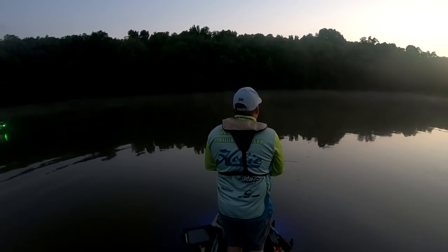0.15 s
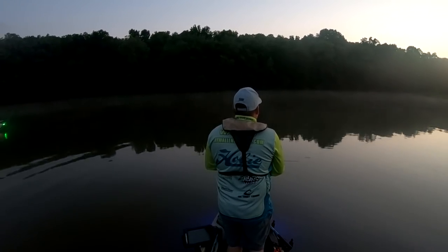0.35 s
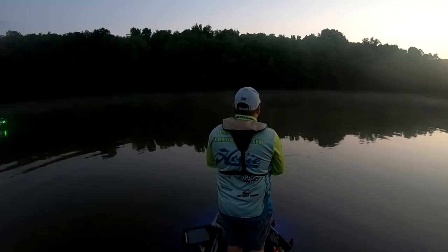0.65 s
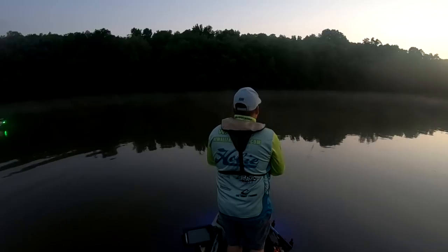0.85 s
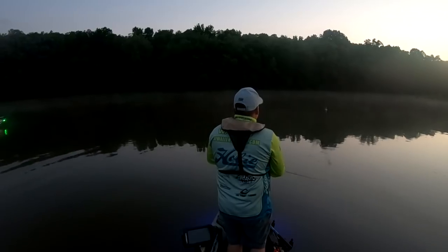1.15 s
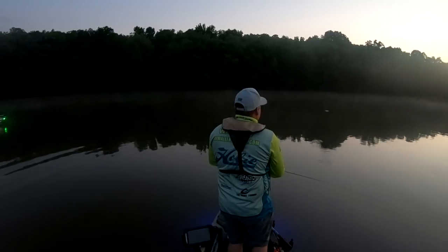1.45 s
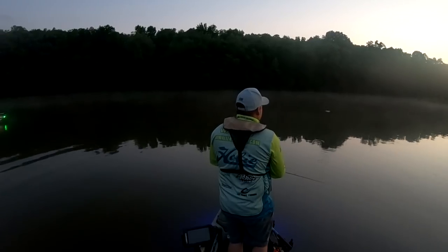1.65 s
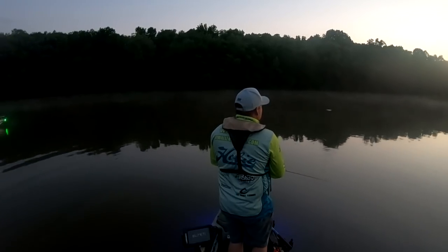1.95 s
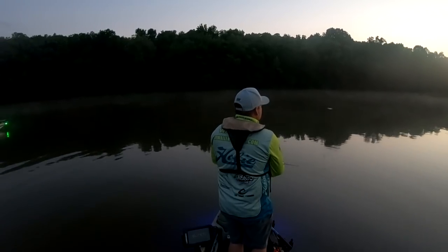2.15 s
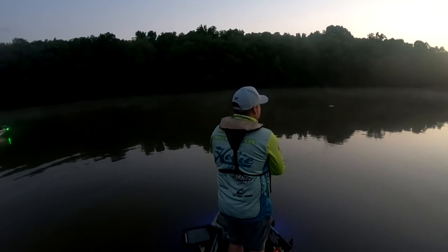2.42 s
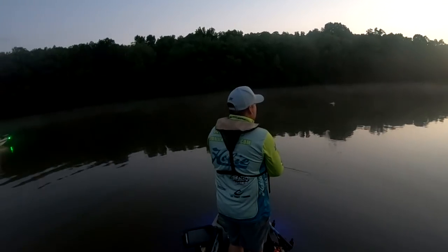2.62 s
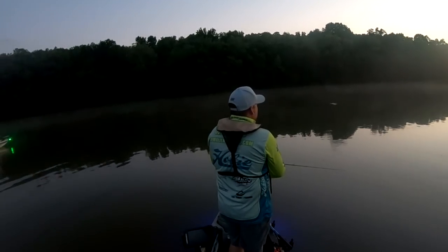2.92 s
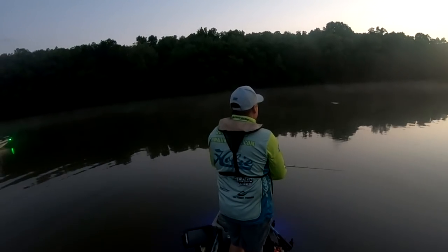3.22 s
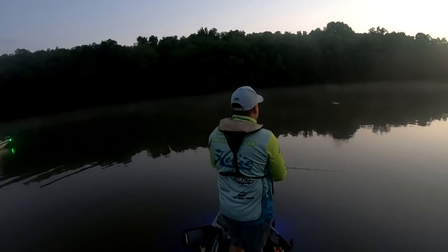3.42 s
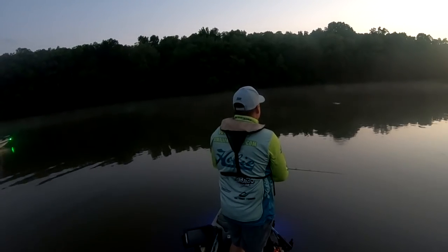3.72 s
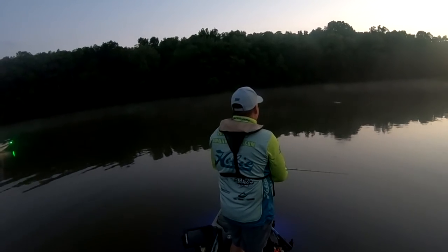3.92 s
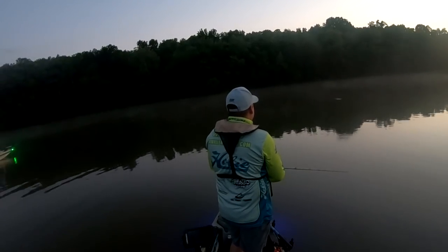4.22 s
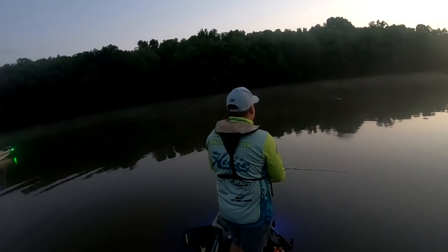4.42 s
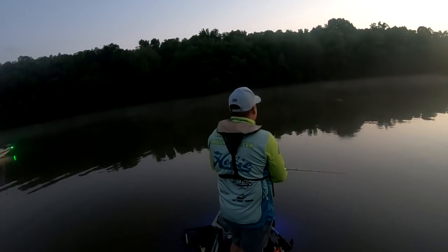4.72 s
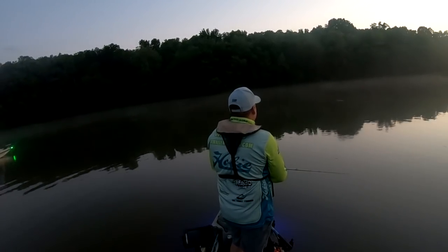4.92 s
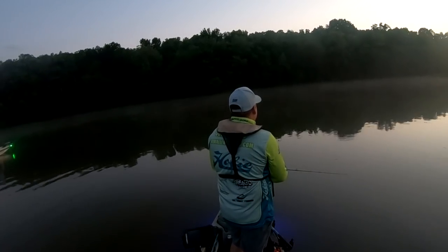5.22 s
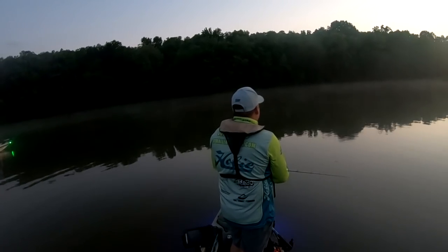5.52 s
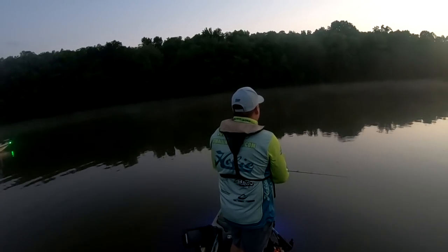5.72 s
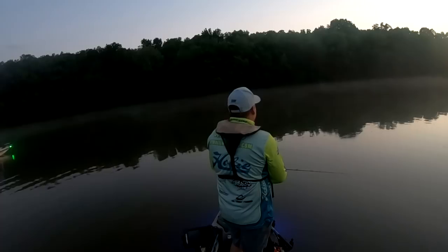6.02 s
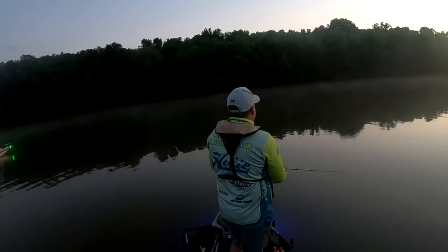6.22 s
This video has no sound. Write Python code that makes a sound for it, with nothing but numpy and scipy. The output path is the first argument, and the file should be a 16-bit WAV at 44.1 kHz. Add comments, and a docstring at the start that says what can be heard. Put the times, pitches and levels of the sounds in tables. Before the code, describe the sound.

A microphone on a small boat picks up irregular, deep wind buffeting beneath a busy, delicate bird chorus with soft woodland echo. Near birds whistle, slur and chirp constantly, with distant voices blending behind them. A few small clicks and muffled hull knocks interrupt early on. Later, high paired notes climb in volume, and two quick descending stutters close the scene over faint wash and hiss.

```python
"""Dawn on a still lake, heard from a small boat. Throughout: wooded-shore chorus, hull wash, murmur and hiss,
while air rumbles unevenly on the microphone ports. Near birds whistle, slide, tsip, buzz and arch from the start;
boat ticks and bumps join after 1 s, rising see-see pairs near 4 s, a stuttering call just after 6 s.
Birds are swept sines with trembling pitch and level, plus shore echoes and a diffuse wood tail;
air and far blur are shaped noise; boat contacts are noise bursts in damped resonances."""
import sys
import numpy as np
from scipy import signal
from scipy.fft import rfft, irfft
from scipy.io import wavfile
from scipy.ndimage import uniform_filter1d

SR = 44100
rng = np.random.default_rng(int(sys.argv[2]) if len(sys.argv) > 2 else 0)


def wav_out(sig):
    """Save sig, one row per channel (or a flat mono array), as 16-bit PCM at SR to the path in sys.argv[1]."""
    wavfile.write(sys.argv[1], SR, np.round(np.clip(np.atleast_2d(sig).T, -1, 1) * 32767).astype(np.int16))


N = 280476
TIME_S = np.arange(N) / SR
BINS_HZ = np.arange(N // 2 + 1) * SR / N

# Landscape murmur spectrum: (frequency [Hz], relative density [dB/Hz])
MURMUR_SPECTRUM = [(200, 0), (310, 0), (385, -5), (470, -3), (570, -6), (730, 0), (860, -.5), (1020, -12),
                   (1400, -11), (1750, -13), (2600, -20)]
# Hiss spectrum: (frequency [Hz], relative density [dB/Hz])
HISS_SPECTRUM = [(300, 3.5), (1500, -0.5), (5000, -7), (8000, -9), (12500, -11.5)]
# Air on the ports, before layer gains: (time [s], deep rumble [dB], upper flutter [dB])
WIND_DB = [(0.0, -43.5, -51.5), (0.44, -32, -37.5), (1.04, -43.5, -50.5), (1.29, -36.5, -40),
           (1.66, -35.5, -40), (1.75, -50, -54), (1.99, -27.5, -35.5), (2.01, -30.5, -43), (2.3, -39, -33),
           (2.35, -24.5, -32), (2.67, -31.5, -35), (2.83, -37.5, -45), (3.65, -32.5, -47),
           (3.89, -39.5, -45.5), (3.94, -26, -47), (3.99, -27.5, -35), (4.04, -34.5, -40.5),
           (4.15, -25.5, -43.5), (4.24, -26, -35), (4.31, -41.5, -49.5), (4.59, -45.5, -58),
           (4.96, -39.5, -47), (5.35, -45, -53.5), (5.65, -22, -36.5), (5.93, -32.5, -42.5),
           (6.34, -29, -43.5)]
# Single puffs on the ports: (time [s], rise above the surrounding wind [dB])
PUFFS = [(.71, 10), (1.451, 7), (3.41, 4.5)]
# Deep buffeting spectrum: (frequency [Hz], relative density [dB/Hz])
RUMBLE_SPECTRUM = [(12, -30), (25, 2.5), (40, -4), (62, -2), (80, -13.5), (120, -21)]
# Upper buffeting spectrum: (frequency [Hz], relative density [dB/Hz])
FLUTTER_SPECTRUM = [(45, -15.5), (72, 2), (100, -4), (130, -8), (170, -16.5), (220, -26.5), (300, -47.5),
                    (500, -56)]
# Wash around the hull: (frequency [Hz], relative density [dB/Hz])
WASH_SPECTRUM = [(80, -30), (130, -3), (180, 7.5), (225, -6.5), (280, -19), (400, -27)]
RUMBLE_GAIN_DB, FLUTTER_GAIN_DB = 0.69, 2.5
PUFF_HALF_S, GUST_SCALE_DB = 0.015, 0.89  # 1/e half-length; multiplies walk()

# Far singers, before layer gains: (time [s], low voices [dB], high voices [dB])
CHORUS_DB = [(0.0, -68, -80.5), (0.69, -69, -80.5), (2.57, -69, -78), (2.73, -68.5, -71),
             (4.52, -69.5, -73), (5.17, -65.5, -81.5), (6.0, -68, -77), (6.36, -68.5, -80)]
# Low far voices: (frequency [Hz], relative density [dB/Hz])
LOW_VOICE_SPECTRUM = [(1600, -26), (2000, -10), (2400, -4.5), (3000, -2), (3600, -9), (4200, -13.5),
                      (5000, -18)]
# High far voices: (frequency [Hz], relative density [dB/Hz])
HIGH_VOICE_SPECTRUM = [(4000, -12.5), (4900, -4.5), (5250, 0), (5700, -6), (6300, -6.5), (7000, -11.5),
                       (7600, -12.5), (8100, -34)]

# Level whistles: (start [s], length [s], mid-note pitch [Hz], level [dB])
WHISTLES = [(0.554, 0.17, 2790, -65), (0.767, 0.044, 2353, -64), (0.947, 0.18, 2984, -67.5),
            (1.104, 0.049, 2340, -64.5), (1.273, 0.2, 3030, -64), (1.708, 0.091, 3000, -64),
            (2.212, 0.033, 5300, -64.5), (2.232, 0.086, 2630, -65), (2.506, .09, 2616, -62.5),
            (2.603, 0.14, 2714, -70), (2.805, 0.061, 2078, -65.5), (2.892, 0.13, 2674, -67.5),
            (3.712, .17, 3990, -65), (4.208, 0.18, 2814, -66.5), (4.554, 0.16, 2934, -64.5),
            (4.752, 0.044, 2400, -65), (4.917, 0.029, 2940, -62), (5.104, 0.07, 3450, -66.5)]
WHISTLE_DROOP, WHISTLE_LEFT_DB = 0.012, 3.5  # share by which both ends lie flat; left minus right
# Slurs that settle on a pitch: (start [s], length [s], first [Hz], final [Hz], level [dB])
SLIDES = [(.005, 0.076, 3600, 3170, -66.5), (0.646, 0.064, 2310, 2817, -67), (1.566, 0.13, 3560, 2833, -66),
          (1.615, .05, 2547, 2944, -58.5), (2.106, 0.059, 2890, 2634, -61), (2.293, .12, 3036, 3250, -58),
          (2.338, .085, 3540, 4220, -71), (2.53, .06, 4040, 3155, -58), (2.565, .1, 6010, 4930, -65),
          (2.591, 0.036, 3150, 3440, -57.5), (2.951, .07, 5960, 4700, -63), (2.608, .09, 3760, 4190, -69.5),
          (3.2, .085, 6510, 5370, -58.5), (3.358, 0.045, 4340, 4590, -63),
          (3.587, 0.062, 6340, 4270, -64.5), (3.641, 0.082, 3950, 3326, -64), (5.003, .08, 3150, 2964, -66),
          (5.06, .09, 2590, 2430, -65.5), (5.226, 0.056, 2900, 3240, -57), (6.323, 0.038, 2265, 2370, -64)]
SLIDE_EASE, SLIDE_LEFT_DB = 2.4, -1  # higher ease settles earlier
# Exponential sweeps: (start [s], length [s], first [Hz], last [Hz], level [dB])
SWEEPS = [(0.617, .025, 3180, 3620, -67), (.93, 0.024, 4760, 4250, -66), (1.012, 0.095, 3790, 2190, -65.5),
          (1.286, 0.041, 2700, 4660, -63.5), (1.36, .012, 4570, 3380, -61.5),
          (1.815, .055, 4643, 5380, -71.5), (2.489, 0.061, 5440, 3950, -70),
          (2.753, 0.046, 3480, 2110, -63), (2.932, .042, 3690, 1956, -65), (3.042, 0.097, 4410, 2135, -58),
          (3.247, .077, 4220, 2117, -57.5), (3.801, .18, 2214, 3162, -67), (3.863, 0.038, 4080, 3440, -56),
          (4.046, .035, 3340, 2800, -65.5), (4.248, 0.036, 5320, 4570, -62),
          (4.482, 0.077, 5400, 4300, -65.5), (4.714, 0.069, 5320, 4300, -63),
          (4.734, .039, 3200, 6290, -64), (4.8, 0.017, 4240, 2730, -62), (5.038, 0.015, 3340, 3600, -58.5),
          (5.274, .11, 2430, 1950, -68.5), (5.375, 0.034, 3750, 2980, -60), (5.73, .038, 2590, 3770, -60.5),
          (5.747, 0.11, 2540, 1910, -64), (5.919, 0.044, 5850, 5280, -65), (6.039, 0.11, 2440, 1890, -65)]
SWEEP_BALANCE, SWEEP_LEFT_DB = 0.45, -1  # below 0.5: front-weighted

# Tsip pairs: (first note's hook top [s], first note [dB], second note [dB])
TSIPS = [(0.008, -69.5, -70), (0.672, -67.5, -73.5), (1.39, -67, -72), (2.061, -64.5, -71),
         (2.719, -64, -70.5), (3.434, -61, -64), (4.237, -59, -68), (4.793, -60.5, -68),
         (5.717, -62.5, -81)]
# Tsip shape, hook up then plunge: (time from top [s], nominal pitch [Hz], relative level [dB])
TSIP_SHAPE = [(-.016, 5300, -14), (-.009, 6700, -8), (-.002, 7350, -9), (.008, 7280, -6), (.017, 6900, -1),
              (.024, 6150, 3), (.031, 4800, -2)]
TSIP_GAP_S = 0.114

STRAY_PER_S, STRAY_BASE_DB, STRAY_SPREAD_DB = 16, -75, 3  # levels lie 1-2 spreads above base
STRAY_HZ, STRAY_LENGTH_S = (2288, 4220), (0.02, 0.098)
STRAY_SWEEP = 0.26  # widest end-to-end glide, as a share of pitch

# Trilled notes:
# (start [s], end [s], first [Hz], middle [Hz], last [Hz], rate [Hz], peak depth [Hz], level [dB])
TRILLS = [(0.137, 0.249, 6130, 5900, 5360, 148, 480, -66),
          (1.558, 1.679, 5780, 6070, 5520, 145.6, 490, -62.5),
          (3.452, 3.674, 3840, 3885, 3850, 44.7, 130, -69), (3.658, 3.75, 4200, 4220, 4020, 44.5, 129, -64),
          (4.449, 4.563, 5950, 5930, 5520, 146, 460, -64.5)]
# Arched notes: (top [s], rise [s], fall [s], foot pitch [Hz], top pitch [Hz], level at foot [dB])
ARCHES = [(0.358, 0.061, 0.046, 2630, 6260, -62), (0.836, 0.059, 0.12, 2860, 4020, -61),
          (1.411, 0.085, .08, 2450, 4410, -60), (2.001, .035, .07, 3310, 4080, -67.5),
          (2.92, 0.059, 0.052, 5460, 6520, -61), (3.78, 0.042, 0.059, 4390, 5200, -66),
          (5.255, .075, .14, 2470, 4100, -60.5), (5.574, 0.046, 0.037, 2400, 3680, -62)]
ARCH_TOP_DB, ARCH_LEFT_DB = -7, -2.5  # top relative to foot; left minus right

# Light ticks of fishing tackle: (time [s], relative peak level [dB], resonance [Hz])
TICKS = [(.993, -48.5, 3020), (1.157, -49.5, 1780), (1.32, -57, 1080), (2.532, -49.5, 1890),
         (2.657, -55, 1400), (2.67, -54, 955), (2.683, -53, 1800)]
# Soft bumps on the hull: (time [s], relative peak level [dB], resonance [Hz])
BUMPS = [(1.53, -61, 486), (2.66, -50, 460), (2.668, -26, 173), (2.675, -42, 250), (2.686, -28.5, 158),
         (2.725, -54, 298), (3.025, -53, 290), (3.342, -45, 289), (3.35, -57.5, 470), (3.46, -55, 280),
         (3.945, -53.5, 310), (4.18, -53, 335)]

# See-see pairs, growing louder: (start [s], level [dB])
SEEPS = [(3.842, -69.5), (4.074, -66.5), (4.309, -64), (4.552, -61), (4.789, -60)]
SEEP_HZ = (5480, 6270, 6720)  # first, middle, last
SEEP_LENGTH_S, SEEP_GAP_S, SEEP_LEFT_DB = 0.031, 0.042, -4

# Downward stuttering calls: (start [s], level [dB])
STUTTERS = [(6.105, -52), (6.237, -54)]
# Three steps and an afternote: (time from start [s], pitch [Hz], relative level [dB])
STUTTER_SHAPE = [(0, 4370, -12), (.017, 3950, -14), (.026, 3604, 1), (0.036, 3350, -12), (.042, 2924, 4.5),
                 (0.055, 2810, -27.5), (.06, 3200, -18), (0.073, 3050, 1.5), (.085, 2750, -29)]

# Shore-line echoes: (delay [s], level [dB])
ECHOES = [(.032, -16), (0.052, -21.5), (.078, -19.5)]
# Port differences for bird sound: (frequency [Hz], left minus right [dB], left phase lead [rad])
PORTS = [(2020, 0, 1.88), (2880, 0, 1.25), (3540, -3, 0.46), (4560, -8.5, 0.78), (5170, -17.5, -1.6),
         (5560, -14, 0.051), (7300, -8, -2.1)]
WOOD_T60_S, WOOD_DB = 0.5, -7.3
TOP_HZ = 12750


def undb(db):
    """Decibels to amplitude gain."""
    return 10 ** (np.asarray(db) / 20)


def unit(x):
    """Scale to rms 1."""
    return x / np.sqrt(np.mean(x ** 2) + 1e-20)


def curves(table):
    """Interpolate the columns of a time table at each sample."""
    time_s, *columns = np.transpose(table)
    return [np.interp(TIME_S, time_s, column) for column in columns]


def colour(x, spectrum):
    """Filter by (frequency [Hz], gain [dB]) points, -120 dB/octave past both ends; rms 1."""
    hz, db = np.transpose(spectrum)
    octave, knots = np.log2(BINS_HZ + 1), np.log2(hz)
    outside = np.abs(octave - np.clip(octave, knots[0], knots[-1]))
    gain = undb(np.interp(octave, knots, db) - 120 * outside)
    return unit(irfft(rfft(x) * gain, N))


def noise(spectrum):
    """Gaussian noise with the given spectrum, rms 1."""
    return colour(rng.standard_normal(N), spectrum)


def pan(x, left_db):
    """Set left minus right level, keeping mean power."""
    gains = undb([[left_db / 2], [-left_db / 2]])
    return unit(gains) * x


def add(out, start_s, x):
    """Mix x into out at start_s."""
    i = int(np.clip(start_s * SR, 0, N - 1))
    out[..., i:i + x.shape[-1]] += x[..., :N - i]


def walk(rate_hz):
    """Random piecewise-linear wander, rms near 2."""
    k = int(SR / rate_hz)
    steps = np.repeat(rng.standard_normal(N // k + 1), k)
    return 2.37 * uniform_filter1d(steps, k)[:N]


def progress(length_s):
    """Ramp from 0 to 1 over a note."""
    return np.linspace(0, 1, max(int(length_s * SR), 64))


def glide(length_s, first_hz, middle_hz, last_hz):
    """Parabolic pitch path through three points."""
    arc = np.polyfit([0, .5, 1], [first_hz, middle_hz, last_hz], 2)
    return np.polyval(arc, progress(length_s))


def whistle(hz, balance=0.48, focus=1., waver=0.0073, flutter_db=2.5):
    """Syrinx tone, rms 1: a swept sine under a swell, with random pitch and level tremble."""
    u, t = np.linspace(0, 1, len(hz)), np.arange(len(hz)) / SR
    knots_s = np.arange(80) / 160
    pitch, level = (np.interp(t, knots_s, c) for c in rng.standard_normal((2, 80)))
    swell = np.exp(-(focus * (u - balance)) ** 2 + 4 * (balance - .5) * u)
    swell = swell * signal.windows.tukey(len(hz), .2)
    phase = 2 * np.pi * np.cumsum(hz * (1 + waver * pitch)) / SR
    return unit(swell * undb(flutter_db * level) * np.sin(phase))


def slur(time_s, hz, db):
    """Whistle along a time, pitch and level path; the throat cannot turn sharp corners."""
    t = np.arange(time_s[0], time_s[-1], 1 / SR)
    pitch_hz = uniform_filter1d(np.interp(t, time_s, hz), len(t) // 12, mode="nearest")
    return undb(np.interp(t, time_s, db)) * whistle(pitch_hz, focus=0)


def woods(x, t60_s):
    """Trunks and leaves scatter sound: a decaying noise tail, partly different at each ear."""
    t = np.arange(SR) / SR
    tail = rng.standard_normal(SR) + 0.97 * rng.standard_normal((2, SR))
    onset = 1 - np.exp(-t / 0.0052)
    decay = undb(-60 * t / t60_s) + 2.2 * np.exp(-t / 0.04)
    impulse = unit(tail * onset * decay) / np.sqrt(SR)
    return signal.fftconvolve(np.atleast_2d(x), impulse, axes=1)[:, :N]


def air():
    """Faint landscape murmur, wide by opposite polarity and independent noise, plus even hiss."""
    opposed = noise(MURMUR_SPECTRUM) * np.array([[1], [-1]])
    murmur = opposed + 0.48 * np.array([noise(MURMUR_SPECTRUM), noise(MURMUR_SPECTRUM)])
    hiss = np.array([noise(HISS_SPECTRUM), noise(HISS_SPECTRUM)])
    return undb(-66 + 0.23 * walk(12.0)) * murmur + undb(-77) * hiss


def eddies(spectrum, apart, steady_s=0.077):
    """Port turbulence: shared plus independent noise, slow swells evened by moving power."""
    x = noise(spectrum) + apart * np.array([noise(spectrum), noise(spectrum)])
    power = uniform_filter1d(np.mean(x ** 2, axis=0), int(steady_s * SR))
    return x / np.sqrt(power + 1e-6)


def wind():
    """Two bands of port turbulence share gusts and puffs, over low wash around the hull."""
    deep_db, upper_db = curves(WIND_DB)
    puffs_db = sum(db * np.exp(-((TIME_S - s) / PUFF_HALF_S) ** 2) for s, db in PUFFS)
    gust_db = GUST_SCALE_DB * walk(8) + puffs_db
    rumble = undb(deep_db + gust_db + RUMBLE_GAIN_DB) * eddies(RUMBLE_SPECTRUM, apart=0.19)
    flutter = undb(upper_db + gust_db + FLUTTER_GAIN_DB) * eddies(FLUTTER_SPECTRUM, apart=0.4)
    wash = undb(-54.5 + 1.5 * walk(2.354)) * noise(WASH_SPECTRUM)
    wash = wash * np.array([[1], [-1]])
    return pan(rumble, left_db=-3.5) + pan(flutter, left_db=-4.0) + pan(wash, left_db=-19)


def far_birds(low_hz, high_hz, spectrum, count, blur_db, direct_db):
    """Distant random slurs with wood echo, over noise for the blur of still farther singers."""
    calls = np.zeros(N)
    for when, pitch, length, slope, bend, size in rng.random((count, 6)):
        hz = low_hz + pitch * (high_hz - low_hz)
        sweep = 0.28 * (slope - .5)
        middle_hz = hz * (1 + .16 * (bend - .5))
        path = glide(0.0202 + .06 * length, hz * (1 - sweep), middle_hz, hz * (1 + sweep))
        add(calls, when * N / SR, undb(7.9 * size) * whistle(path))
    voices = colour(woods(calls, t60_s=0.31) + undb(direct_db) * calls, spectrum)
    blur = colour(rng.standard_normal(N) + 0.78 * rng.standard_normal((2, N)), spectrum)
    return unit(voices + undb(blur_db) * blur)


def chorus():
    """Low and high far singers, each following its level curve."""
    low_db, high_db = curves(CHORUS_DB)
    low = far_birds(2200, 3900, LOW_VOICE_SPECTRUM, count=220, blur_db=2.0, direct_db=4.5)
    high = far_birds(4700, 6700, HIGH_VOICE_SPECTRUM, count=300, blur_db=-2.0, direct_db=3.0)
    return undb(low_db + 2.0) * low + pan(undb(high_db + 8.5) * high, left_db=5)


def whistlers():
    """Swept-sine notes: level whistles, slides easing onto a pitch, exponential sweeps."""
    out = np.zeros((2, N))
    for start_s, length_s, hz, db in WHISTLES:
        end_hz = hz * (1 - WHISTLE_DROOP)
        note = whistle(glide(length_s, end_hz, hz, end_hz), balance=0.43)
        add(out, start_s, pan(undb(db) * note, WHISTLE_LEFT_DB))
    for start_s, length_s, first_hz, final_hz, db in SLIDES:
        hz = final_hz + (first_hz - final_hz) * (1 - progress(length_s)) ** SLIDE_EASE
        add(out, start_s, pan(undb(db) * whistle(hz, balance=0.5), SLIDE_LEFT_DB))
    for start_s, length_s, first_hz, last_hz, db in SWEEPS:
        hz = first_hz * (last_hz / first_hz) ** progress(length_s)
        note = whistle(hz, SWEEP_BALANCE, waver=.012, flutter_db=3.5)
        add(out, start_s, pan(undb(db) * note, SWEEP_LEFT_DB))
    return out


def tsips():
    """Pairs of hooked, plunging notes, the second softer; pitch varies by about 1%."""
    out = np.zeros(N)
    offset_s, hz, shape_db = np.transpose(TSIP_SHAPE)
    for s, first_db, second_db in TSIPS:
        for top_s, db in ((s, first_db), (s + TSIP_GAP_S, second_db)):
            note_hz = hz * (1 + 0.01 * rng.standard_normal())
            add(out, top_s + offset_s[0], slur(offset_s, note_hz, db + shape_db))
    return out


def strays():
    """Faint single glides at random times, pitches and positions along the shore."""
    out = np.zeros((2, N))
    count = int(STRAY_PER_S * N / SR)
    for when, pitch, length, slope, bend, size, side in rng.random((count, 7)):
        hz = STRAY_HZ[0] * (STRAY_HZ[1] / STRAY_HZ[0]) ** pitch
        sweep = STRAY_SWEEP * (slope - .5)
        length_s = np.interp(length, (0, 1), STRAY_LENGTH_S)
        middle_hz = hz * (1 + .12 * (bend - .5))
        path = glide(length_s, hz * (1 - sweep), middle_hz, hz * (1 + sweep))
        level_db = STRAY_BASE_DB + STRAY_SPREAD_DB * (size + 1.0)
        add(out, when * N / SR, pan(undb(level_db) * whistle(path), left_db=10 * (side - .5)))
    return out


def trills():
    """Buzzy notes: fast sinusoidal pitch swing, each cycle loudest at its bottom."""
    out = np.zeros(N)
    for start_s, end_s, first_hz, middle_hz, last_hz, rate_hz, depth_hz, db in TRILLS:
        hz = glide(end_s - start_s, first_hz, middle_hz, last_hz)
        swing = np.sin(2 * np.pi * rate_hz * np.arange(len(hz)) / SR)
        note = whistle(hz + depth_hz * swing, focus=1.3)
        add(out, start_s, undb(db) * (1 - .5 * swing) * note)
    return out


def archers():
    """Notes whose pitch climbs and sinks on a squared sine, thinning at the top."""
    out = np.zeros(N)
    for top_s, rise_s, fall_s, foot_hz, top_hz, db in ARCHES:
        u = np.concatenate([progress(rise_s), 1 + progress(fall_s)])
        height = np.sin(np.pi / 2 * u) ** 2
        hz = foot_hz + (top_hz - foot_hz) * height
        note = whistle(hz, focus=0, waver=0.013, flutter_db=5.0)
        add(out, top_s - rise_s, undb(db + ARCH_TOP_DB * height) * note)
    return pan(out, ARCH_LEFT_DB)


def knocks(table, burst_s, width):
    """Brief contacts: a noise burst through a damped resonance, applied twice."""
    out, t = np.zeros(N), np.arange(SR // 5) / SR
    for s, db, hz in table:
        burst = rng.standard_normal(len(t)) * t * np.exp(-t / burst_s)
        resonance = signal.iirpeak(hz, 1 / width, fs=SR)
        x = signal.lfilter(*resonance, signal.lfilter(*resonance, burst))
        add(out, s, 2 * undb(db) * x / np.abs(x).max())
    return out


def boat():
    """Light ticks and dull bumps, opposite polarity at the two ears for width."""
    ticks = knocks(TICKS, burst_s=0.0025, width=0.9)
    bumps = knocks(BUMPS, burst_s=0.004, width=0.32)
    return pan((ticks + bumps) * np.array([[1], [-1]]), left_db=-7.0)


def seeps():
    """Pairs of short, high upward glides."""
    out = np.zeros(N)
    for start_s, db in SEEPS:
        for late_s in (0, SEEP_GAP_S):
            note = whistle(glide(SEEP_LENGTH_S, *SEEP_HZ), balance=0.44)
            add(out, start_s + late_s, undb(db) * note)
    return pan(out, SEEP_LEFT_DB)


def stutters():
    """One stepped, falling pitch and level path, repeated."""
    out = np.zeros(N)
    offset_s, hz, shape_db = np.transpose(STUTTER_SHAPE)
    for start_s, db in STUTTERS:
        add(out, start_s, slur(offset_s, hz, db + shape_db))
    return pan(out, left_db=-0.5)


def near_birds():
    """Sum of the singers in the nearest trees."""
    return whistlers() + tsips() + strays() + trills() + archers() + seeps() + stutters()


def at_ports(sound):
    """Split frequency-dependent level and phase differences evenly between the ports."""
    hz, left_db, lead_rad = np.transpose(PORTS)
    phase = np.exp(.5j * np.interp(BINS_HZ, hz, lead_rad))
    half = undb(np.interp(BINS_HZ, hz, left_db) / 2) * phase
    ports = np.array([half, 1 / half])
    ports = ports / np.sqrt(np.mean(np.abs(ports) ** 2, axis=0))
    return irfft(rfft(sound) * ports, N)


def birds():
    """Near singers with discrete echoes and wood tail, plus the far chorus, at both ports."""
    near = near_birds()
    echo = np.zeros((2, N))
    for delay_s, db in ECHOES:
        add(echo, delay_s, undb(db) * near)
    return at_ports(near + echo + undb(WOOD_DB) * woods(near, WOOD_T60_S) + chorus())


def scene():
    """Sum of air, wind, birds and boat."""
    return air() + wind() + birds() + boat()


def record(dry):
    """Steep elliptic low-pass removes the top."""
    lowpass = signal.ellip(10, .2, 80, TOP_HZ, fs=SR, output="sos")
    return signal.sosfilt(lowpass, dry)


dry = scene()
out = record(dry)
wav_out(out)
```